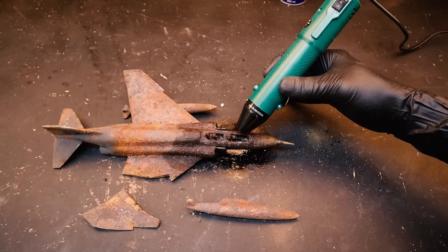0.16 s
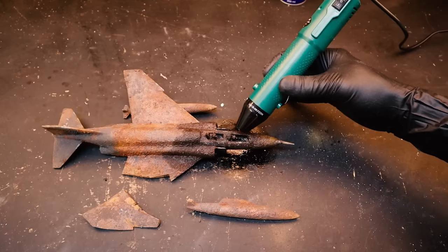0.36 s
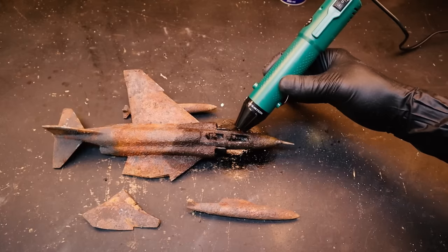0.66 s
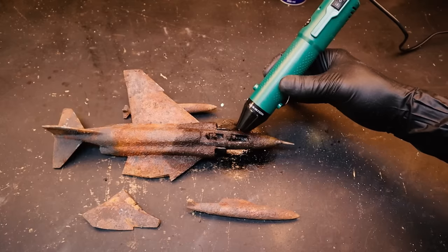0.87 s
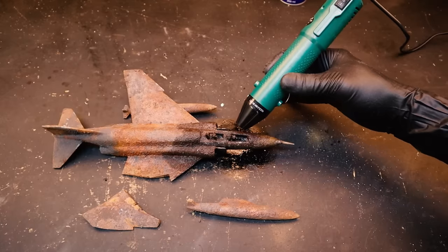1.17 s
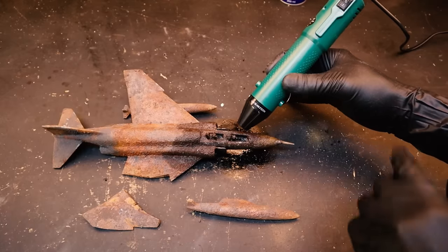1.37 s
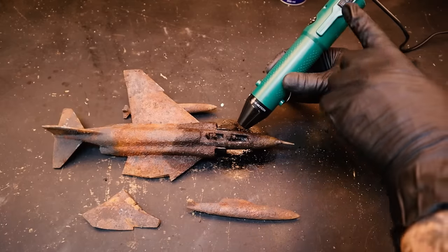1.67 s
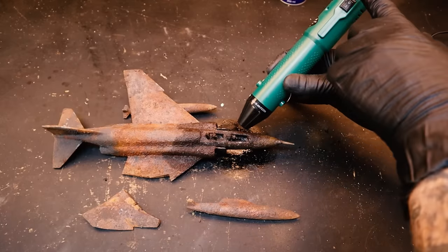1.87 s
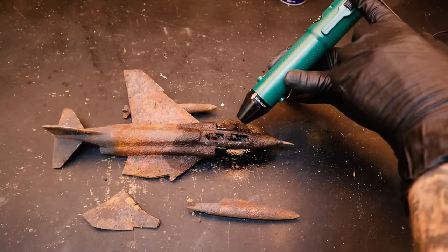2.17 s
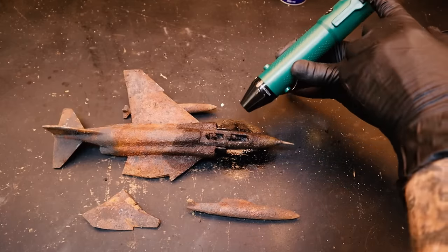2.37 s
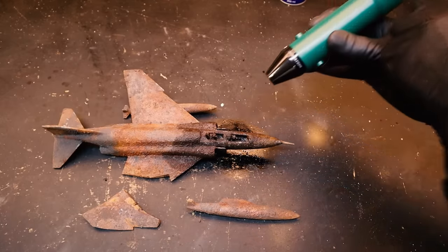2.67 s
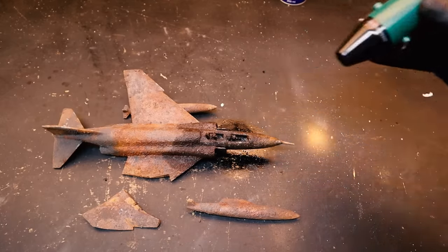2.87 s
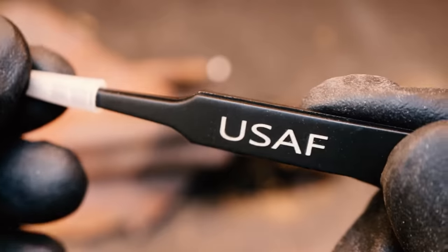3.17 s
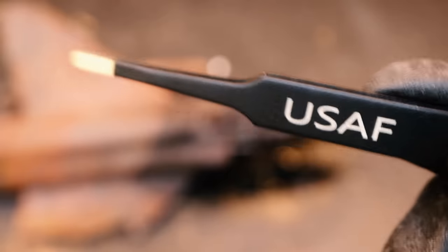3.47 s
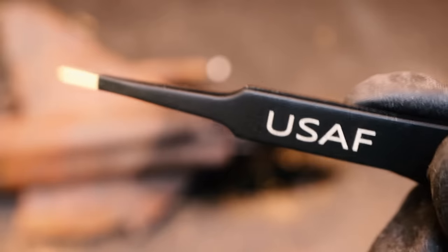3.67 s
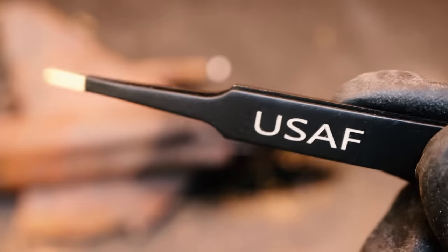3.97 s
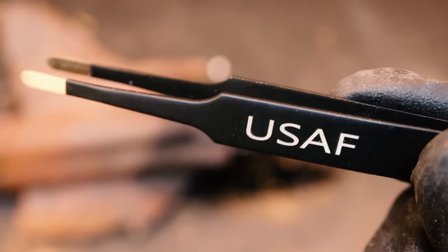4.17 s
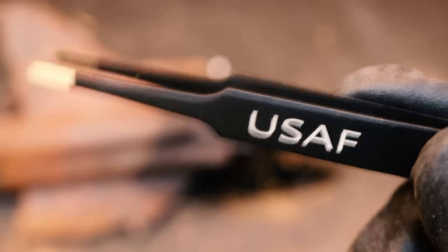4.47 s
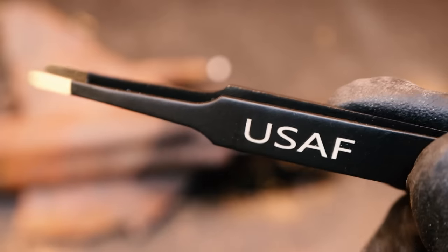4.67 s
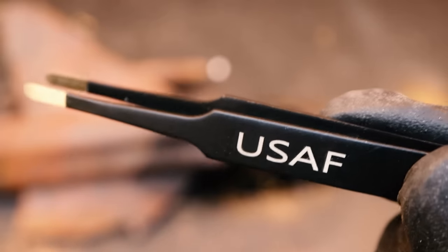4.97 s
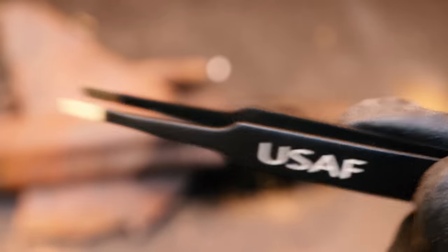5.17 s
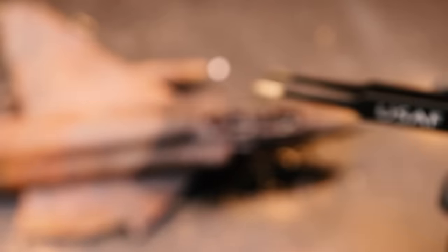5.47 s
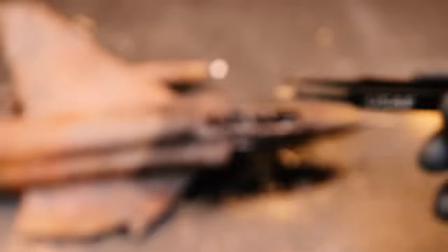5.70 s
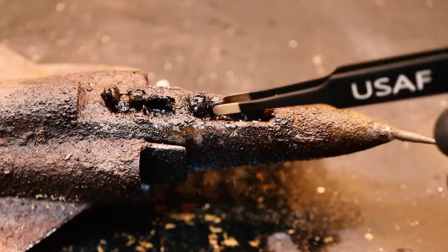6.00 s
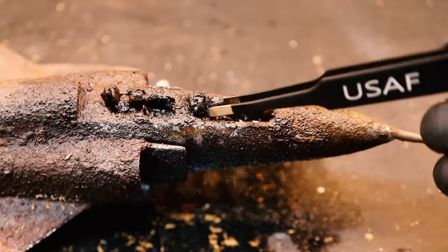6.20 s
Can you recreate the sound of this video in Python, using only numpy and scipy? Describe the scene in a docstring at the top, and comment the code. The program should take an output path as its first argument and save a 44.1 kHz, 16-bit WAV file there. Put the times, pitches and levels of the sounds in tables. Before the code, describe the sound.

Steady high electric whine, sharp switch click and falling spin-down; abrupt cut to hushed insect night, faint metal ticks and a quickening hollow croak-like call.

```python
"""A workbench, then a quiet night outdoors: a small rotary tool whines, is switched off with a snap
and coasts down, rattling; it and the room tone stop short at 3 s as the night air comes in.
The tool is rotor harmonics plus impacts ringing its housing; crickets are trains of falling tones;
light clicks and scrapes of tweezers in gloved hands are shaped noise; a hollow knocking call,
perhaps a frog, is a quickening, fading train of pulses ringing one set of modes."""
import sys
import numpy as np
from scipy import signal
from scipy.fft import rfft, irfft
from scipy.io import wavfile

SR = 44100
rng = np.random.default_rng(int(sys.argv[2]) if len(sys.argv) > 2 else 0)


def generate_wav(signal):
    """Clip the signal to [-1, 1] and save it as 16-bit WAV at the path in sys.argv[1]."""
    frames = np.transpose(np.atleast_2d(signal))
    scaled = np.clip(frames, -1, 1) * 32767
    pcm = np.round(scaled).astype(np.int16)
    wavfile.write(sys.argv[1], SR, pcm)


N = 279594
T = np.arange(N) / SR
HZ = np.fft.rfftfreq(N, 1 / SR)
MAINS_HZ = 50


def amp(db):
    """Decibels to gain."""
    return 10 ** (np.asarray(db) / 20)


def evened(x):
    """Scales to rms 1."""
    return x / np.sqrt(np.mean(x ** 2) + 1e-20)


def read(points, hz):
    """A spectrum table interpolated on a log-frequency axis."""
    f, value = np.transpose(points)
    return np.interp(np.log(hz + 1), np.log(f), value)


def panned(db):
    """Left and right gains for a level difference."""
    return amp(np.array([[.5], [-.5]]) * db)


def coloured(x, db):
    """Filters by a dB spectrum, to rms 1."""
    return evened(irfft(rfft(x) * amp(db), N))


def hiss(db, side_db=-3):
    """Stereo noise of rms 1 with a given spectrum and side-to-mid level."""
    mid, side = rfft(rng.standard_normal((2, N)))
    side = side * amp(side_db)
    return evened(irfft(np.array([mid + side, mid - side]) * amp(db), N))


def hump(hz, octaves):
    """A bell-shaped band in dB, down 4.34 dB at the given octaves from its centre."""
    return -4.34 * (np.log2((HZ + 1) / hz) / octaves) ** 2


def waver(rate_hz):
    """Low-passed noise of rms 1: random variation up to about rate_hz."""
    return coloured(rng.standard_normal(N), -10 * np.log10(1 + (HZ / rate_hz) ** 6))


def echoes(x, t60_s):
    """A dense tail of reflections of energy 1, different for each ear."""
    t = T[:SR // 2]
    tail = rng.standard_normal((2, len(t))) * amp(-60 * t / t60_s)
    tail = tail / np.linalg.norm(tail, axis=1)[:, None]
    return signal.fftconvolve(np.atleast_2d(x), tail, axes=1)[:, :N]


def add(mix, s, sound):
    """Adds a stereo sound at time s."""
    part = mix[:, round(s * SR):][:, :sound.shape[1]]
    part += sound[:, :part.shape[1]]


def ports(x, lag_s=.000045):
    """Sound from the right reaches the left port a little later."""
    return irfft(rfft(x) * np.exp(-2j * np.pi * HZ * lag_s * np.array([[1], [0]])), N)


def tool():
    """Mains pulses push the rotor, so speed and rattle throb until switch-off; then it coasts unevenly."""
    # rotor speed under power: (time [s], speed [turns/s])
    powered_speed = [(0, 326), (.15, 329.3), (.5, 330.3), (1.3, 329.9), (1.6, 330.8), (2.0, 331.1)]
    off_s, coast_s = 2.534, 0.315  # switch opens; time constant of friction
    swing_rad, unsteady_share = .05, .018
    whine_per_halving_db, rattle_per_halving_db = -15, -12  # change each time the speed halves
    full_rattle_db, room_db, room_t60_s = 2, -18, 0.66

    coasted = np.maximum(T - off_s, 0) / coast_s
    halvings = coasted / np.log(2)
    speed = np.interp(T, *np.transpose(powered_speed)) * np.exp(-coasted)
    mains, powered = 2 * np.pi * MAINS_HZ * T, T < off_s
    wobble = 1 + unsteady_share * np.clip((T - off_s) / 0.12, 0, 1) * waver(70)
    push = powered * swing_rad / (2 * np.pi) * (np.sin(mains) + .4 * np.sin(2 * mains))
    turns = np.cumsum(speed * wobble) / SR + push
    ripple = 1 + powered * (0.068 * np.cos(mains) + .055 * np.cos(2 * mains))
    whine_db = whine_per_halving_db * halvings
    rattle_db = full_rattle_db + rattle_per_halving_db * halvings
    tones = whine(speed, turns, mains, whine_db) + rings(turns, halvings) + singing(turns, mains, whine_db)
    tones = tones + amp(room_db) * echoes(tones, room_t60_s)
    return tones + amp(rattle_db) * rattle(turns, ripple) + shudder(turns)


def whine(speed, turns, mains, drive_db):
    """Rotor tones and mains sidebands; as they fall they slide through the housing's resonances."""
    # rotor tones before shifts and coasting: (multiple of speed, multiple of mains, level [dB rms],
    # left-right [dB], left lead [rad])
    rotor_tones = [(1, 0, -55, -1, 0.65), (2, 0, -56, -4, 0.35), (3, 0, -51, -11, -0.6),
                   (4, -1, -55.5, -0.5, 0), (4, 0, -54.5, -1, 1), (5, 0, -37.5, -0.5, 0.102),
                   (5, 1, -59, -1.5, -0.11), (6, -1, -61, -9, -0.57), (6, 0, -40, -2, -0.38),
                   (7, 0, -36, -7.5, -1.03), (7, 1, -74, -16, -2.44), (8, -2, -50, 11, -0.19),
                   (8, -1, -52.5, 8, -.8), (8, 0, -34.5, -7, -0.97), (8, 1, -49, 4.5, -0.94),
                   (9, 0, -41.5, -5, -0.63), (10, -1, -46, -1, -0.62), (10, 0, -40, -3.5, -1.6),
                   (11, -1, -47.5, 0, -1.1), (12, 0, -52.5, 6.5, -2), (13, -1, -42.5, -4, -1.4),
                   (13, 0, -45.5, 1.5, 0.3), (14, -1, -54, 1, -1.1), (14, 0, -47, -6.5, -0.5),
                   (15, 0, -49, -13, -3), (21, 1, -51.5, 12, -0.14), (22, 0, -50, -2, 0.11),
                   (23, -1, -45, 3, -0.083), (24, 1, -53, 17, 0.053), (34, 0, -57, 4, 0.031)]
    # answer of the strong tones: (multiple of speed, multiple of mains, shift at start of run-in [dB],
    # shift with the new grip [dB])
    tone_shifts = [(1, 0, -3, 3.5), (3, 0, 0, -2.5), (4, 0, -4, 9.5), (5, 0, -2, -6), (6, -1, 21, 0),
                   (6, 0, -3, -6.5), (7, 0, -2, 4), (8, 0, -3, -4), (8, 1, 1, -7.5), (9, 0, 2.5, 7),
                   (10, 0, 2, -3.5), (13, -1, -4, -2.5), (13, 0, -2, -4), (23, -1, -3.5, -2)]
    grip_from_s, grip_to_s = 1.4, 2.36  # the hand takes a new grip and lifts the tool
    shell_from = 3.6  # tones above this multiple come through the housing; lower ones shake the whole tool
    flutter_share, flutter_hz, blur_rad, blur_hz = 0.026, 27, 0.0036, 59.3
    imbalance, slide = 0.7, 1.1

    grip = np.clip((T - grip_from_s) / (grip_to_s - grip_from_s), 0, 1)
    settling = running_in()
    shifts = {(round(k), round(m)): early_db * settling + grip_db * grip
              for k, m, early_db, grip_db in tone_shifts}
    response, out = housing_db(HZ), np.zeros((2, N))
    turns = turns + blur_rad / (2 * np.pi) * waver(blur_hz)
    for multiple, sideband, db, pan_db, lead_rad in rotor_tones:
        k, m = round(multiple), round(sideband)
        hz = k * speed + m * MAINS_HZ
        slide_db = np.interp(hz, HZ, response) - np.interp(hz.max(), HZ, response)
        slide_db = slide * slide_db * np.clip((k - shell_from) / shell_from, 0, 1)
        fade_db = drive_db * (1 + imbalance / k)  # shaking from imbalance dies first
        level_db = db + shifts.get((k, m), 0) + slide_db + fade_db
        size = amp(level_db) * (1 + flutter_share * waver(flutter_hz))
        phase = k * 2 * np.pi * turns + m * mains + 2 * np.pi * rng.random()
        phase = phase + lead_rad * np.array([[.5], [-.5]])
        out += np.sqrt(2) * size * panned(pan_db) * np.cos(phase)
    return out


def running_in():
    """Falls from 1 to 0 as the tool settles into its steady sound."""
    run_in_s = 0.64
    return np.exp(-(T / run_in_s) ** 3)


def housing_db(hz):
    """How well the plastic housing radiates each frequency."""
    # broad colour: (frequency [Hz], level [dB])
    colour = [(100, -19), (240, -22.5), (450, -10), (620, -1), (1300, -7.5), (2500, 3), (3150, -2),
              (4200, 1), (6300, -5), (9000, -4), (11600, -7), (12250, -19), (12900, -27.5), (14500, -83.5)]
    # resonances: (frequency [Hz], width [Hz], height above the colour [dB])
    modes = [(731, 74, 6.9), (1024, 220, 7.8), (1660, 224, 11.5), (2313, 210, 8.3), (3014, 117, 8.3),
             (3262, 51, 3.4), (3735, 330, 5.5), (4070, 90, 2.2), (4550, 88, 3.2), (5340, 270, 3.13),
             (6980, 2300, 6.7), (11080, 122, 3.6)]
    return read(colour, hz) + sum(db / (1 + (2 * (hz - f) / width) ** 2) for f, width, db in modes)


def rings(turns, halvings):
    """A falling rotor harmonic sweeps through each resonance and sets it ringing in passing."""
    # resonances: (multiple of speed, frequency [Hz], width [Hz], drive at full speed [dB], left-right [dB])
    resonances = [(6, 1800, 60, -23, -5), (10, 3200, 44, -25.5, -2), (10, 2420, 190, -22.5, -7),
                  (12, 2900, 400, -36, -4), (13, 3300, 300, -39, -3), (15, 3750, 400, -39, -3)]
    per_halving_db = -20
    out = np.zeros((2, N))
    for multiple, hz, width_hz, db, pan_db in resonances:
        drive = np.cos(2 * np.pi * (multiple * turns + rng.random()))
        drive = amp(db + per_halving_db * halvings) * drive
        edges_hz = [hz - width_hz / 2, hz + width_hz / 2]
        band = signal.butter(2, edges_hz, "band", fs=SR, output="sos")
        out += panned(pan_db) * signal.sosfilt(band, drive)
    return out


def singing(turns, mains, drive_db):
    """A rough ring, shaken by rotor and mains, fades as the tool settles and dies as the rotor slows."""
    # tone and sidebands: (multiple of speed, multiple of mains, level [dB])
    sidebands = [(0, 0, -2.5), (0, 1, -6.5), (0, -1, -5), (0, -2, -13.5), (-1, 0, -7)]
    sing_hz, wander_hz, throb_share, throb_hz = 3225, 5, 0.22, 70
    settled_db, early_db, pan_db = -55.5, 15, -11.5
    phase = 2 * np.pi * np.cumsum(sing_hz + wander_hz * waver(30)) / SR
    tone = np.zeros(N)
    for k, m, db in sidebands:
        shaken = phase + 2 * np.pi * (round(k) * turns + rng.random()) + round(m) * mains
        tone += amp(db) * (1 + throb_share * waver(throb_hz)) * np.cos(shaken)
    return np.sqrt(2) * amp(settled_db + early_db * running_in() + drive_db) * tone * panned(pan_db)


def rattle(turns, ripple):
    """Bearing and brush impacts on every turn ring the housing; the brushes hiss in step with them."""
    # impacts within a turn: (place [share of the turn], level [dB])
    impacts = [(0.049, -4), (.33, -8.5), (0.412, -4.5), (0.719, -2.5)]
    clatter_db, brush_db = -33, -35
    buzz_from_hz = 5000  # above this the impacts repeat evenly enough to buzz
    uneven, uneven_low, low_hz, even = 0.7, 0.22, 4000, 0.77

    hits = ripple * sum(amp(db) * np.diff(np.floor(turns - place), prepend=np.floor(-place))
                        for place, db in impacts)
    # the sharp edge of each impact repeats evenly; its weight varies from turn to turn
    edge = irfft(rfft(hits) / (1 + (buzz_from_hz / (HZ + 1)) ** 20), N)
    weight_gain = uneven + uneven_low / (1 + (HZ / low_hz) ** 6)
    weight = irfft(rfft(hits * rng.standard_normal(N)) * weight_gain, N)
    hits = even * edge + weight
    ring = 0.37 * hits + echoes(hits, t60_s=0.0044)[0]
    response = housing_db(HZ)
    clatter = coloured(ring + 1.39 * echoes(hits, t60_s=0.13), response)
    clatter = clatter / np.sqrt(np.mean(clatter[:, :2 * SR] ** 2))  # rms 1 under power
    brushes = hiss(response, side_db=-5) * ripple * (1 + 0.31 * np.cos(2 * np.pi * turns))
    pan_db = read([(700, 1.0), (1300, -4.0), (2500, -2.5), (5000, -4.0), (9000, 0.0)], HZ)
    both = amp(clatter_db) * clatter + amp(brush_db) * brushes
    return ports(irfft(rfft(both) * panned(pan_db), N))


def shudder(turns):
    """The slowing spindle rubs once a turn, and the housing's sharp modes swell and fade."""
    # soft swells: (middle [s], half length [s], level [dB])
    swells = [(2.678, 0.046, -40.5), (2.799, 0.038, -40), (2.898, 0.07, -47.5)]
    # what rings: (frequency [Hz], width [Hz], level [dB])
    sharp_modes = [(734, 360, -12.5), (1810, 43, -0.5), (2290, 46, -6.5), (2620, 92, -11), (2840, 110, -5),
                   (3030, 60, -12), (3280, 40, -7), (4270, 140, -14.5)]
    throb_share, pan_db = 0.21, -6.0
    power = sum(amp(db) ** 2 / (1 + (2 * (HZ - hz) / width) ** 2) for hz, width, db in sharp_modes)
    tilt_db = read([(200, -8), (700, -4.5), (4500, 2.5), (12000, -15)], HZ)
    ringing = hiss(10 * np.log10(power) + tilt_db)
    swell = sum(amp(db) * np.exp(-((T - s) / half) ** 2) for s, half, db in swells)
    return swell * (1 + throb_share * np.cos(2 * np.pi * turns)) * ringing * panned(pan_db)


def clicks(rows, top_hz):
    """Hard parts meet: short decaying noise bursts with a little room."""
    room_db, t = -14, T[:SR // 8]
    out = np.zeros((2, N))
    for s, db, hz, octaves, t60_s, pan_db in rows:
        spectrum_db = hump(hz, octaves) - 10 * np.log10(1 + (HZ / top_hz) ** 40)
        burst = hiss(spectrum_db, side_db=2.5)[:, :len(t)]
        add(out, s, amp(db - 60 * t / t60_s) * burst * panned(pan_db))
    return out + amp(room_db) * echoes(out, t60_s=0.17)


def tool_taps():
    """Taps of the tool, the first one its switch."""
    # (time [s], level [dB], centre [Hz], width [octaves], t60 [s], left-right [dB])
    taps = [(2.5333, -12, 7200, 1.1, 0.021, 0), (2.5354, -21, 7000, 1.4, 0.019, -13),
            (2.899, -38.5, 2350, 0.26, 0.04, -10), (2.9455, -32, 2550, 0.42, .02, -5),
            (2.960, -43, 2450, 0.21, 0.04, -4), (2.996, -47, 2300, 0.27, 0.056, -8)]
    return ports(clicks(taps, top_hz=11800))


def tweezers():
    """Tweezer tips click."""
    # (time [s], level [dB], centre [Hz], width [octaves], t60 [s], left-right [dB])
    tips = [(4.4012, -40, 3780, 0.91, 0.014, -4.5), (4.6115, -40.5, 3900, 0.99, 0.015, -3),
            (4.6595, -50.5, 2230, 0.5, 0.032, -2), (6.288, -55, 5000, 1.2, 0.0098, -2)]
    return clicks(tips, top_hz=14500)


def scrapes():
    """Glove and cap slide on the tweezers: brief, slightly grainy noise."""
    # slides: (middle [s], half length [s], level before grain [dB], centre [Hz])
    slides = [(3.207, .04, -74, 12000), (3.383, .03, -71, 11500), (3.428, 0.021, -64, 8550),
              (4.235, .03, -76, 12000), (4.472, .05, -79, 11700), (4.563, 0.02, -68, 10500),
              (4.697, 0.016, -61, 12000), (4.993, 0.033, -65, 12500), (5.183, 0.038, -66, 11800)]
    grain = amp(2.1 * waver(250))
    return grain * sum(amp(db) * np.exp(-((T - s) / half) ** 2) * hiss(hump(hz, octaves=0.34))
                       for s, half, db, hz in slides)


def knocks():
    """Each pulse rings one hollow body with rasp and low boom; a close reflection and diffuse tail follow."""
    # what each knock rings with: (frequency [Hz], relative level [dB], t60 [s])
    body_modes = [(168, -29, 0.37), (201, -19, 0.23), (304, 10, 0.026), (296, -23, 0.097), (350, -23, .12),
                  (421, -13, 0.16), (488, -17, 0.11), (542, -17, 0.11), (765, -34, 0.08), (1440, -41, 0.04),
                  (1570, -41, 0.045), (2080, -41, 0.038)]
    # rasp spectrum: (frequency [Hz], level [dB])
    rasp_spectrum = [(200, -8), (500, 3), (850, -3), (1300, -5), (1600, -1), (1850, -16), (2200, -12),
                     (3200, -29.5), (6000, -60)]
    # tail spectrum: (frequency [Hz], level [dB])
    tail_spectrum = [(125, -29), (160, -8), (330, 2), (520, -6), (800, -12), (1100, -17.5), (1700, -24),
                     (3000, -43.5)]
    body_db, rise_s, lead_s = -34.5, 0.00397, 0.00098
    boom_db, boom_hz, boom_s = -15.5, 175, 0.044  # boom level relative to the body
    echo_db, echo_s = -10, 0.00648
    rasp_db, rasp_s = -54, 0.0074
    tail_db, tail_t60_s, tail_rise_s = -51.5, 0.93, 0.0047
    low_cut_hz = 138

    t, out = T[:SR // 2], np.zeros((2, N))
    ring = sum(amp(db - 60 * t / t60_s) * np.sin(2 * np.pi * hz * (t - rise_s))
               for hz, db, t60_s in body_modes)
    ring = ring * (1 - np.exp(-(t / rise_s) ** 3))
    boom = amp(boom_db) * signal.windows.tukey(round(boom_s * SR), .5)
    ring[:len(boom)] += boom * np.sin(2 * np.pi * boom_hz * (t[:len(boom)] - rise_s))
    ring = amp(body_db) * ring
    rasp = amp(rasp_db) * (t / rasp_s) ** 2 * np.exp(2 - 2 * t / rasp_s)
    tail = amp(tail_db - 60 * t / tail_t60_s) * (1 - np.exp(-t / tail_rise_s))
    rasp_noise = hiss(read(rasp_spectrum, HZ), side_db=-17)
    tail_noise = hiss(read(tail_spectrum, HZ), side_db=-2.0)
    for s, db in knock_train():
        knock = ring + rasp * alike(rasp_noise, len(t)) + tail * alike(tail_noise, len(t))
        add(out, s - lead_s, amp(db) * knock)
        add(out, s - lead_s + echo_s, amp(db + echo_db) * ring[None])
    return irfft(rfft(out) / (1 + (low_cut_hz / (HZ + 1)) ** 10), N)


def knock_train():
    """Time and dB of each knock: the call starts hesitantly, swells, quickens, fades and trails off."""
    call_s, count = 4.6795, 24
    gap_s, quicken_s, hesitate_s, hesitate_knocks = .0789, .000896, .0143, 1.6
    first_db, fade_per_knock_db = 2, -0.3467
    soft_start_db, soft_end_db, ease_knocks = -12, -4, 0.98
    n = np.arange(count)
    gaps = gap_s - quicken_s * n + hesitate_s * np.exp(-n / hesitate_knocks)
    ends_db = soft_start_db * np.exp(-n / ease_knocks) + soft_end_db * np.exp(-n[::-1] / ease_knocks)
    return zip(call_s + np.cumsum(gaps) - gaps, first_db + fade_per_knock_db * n + ends_db)


def alike(noise, count, share=0.93):
    """A stretch of noise that has a share of its power in common with every other stretch."""
    at = rng.integers(N // 2)
    return np.sqrt(share) * noise[:, -count:] + np.sqrt(1 - share) * noise[:, at:at + count]


def crickets():
    """Wing strokes are short falling tones; chirps and trills swell and fade, blurred by the surroundings."""
    # evenly repeated chirps: (first [s], until [s], period [s], pitch [Hz], level [dB],
    # stroke depth [0-1], left-right [dB])
    bouts = [(2.999, 3.1, .185, 5000, -67, .7, 9), (4.503, 5.7, .184, 4985, -65.5, .85, 11),
             (3.011, 3.48, .186, 5220, -68, .35, 5), (3.57, 3.9, .188, 5300, -70, .35, 2),
             (5.39, 6.4, .184, 5205, -68.5, .35, 5)]
    # single trills and buzzes of other insects: (time [s], length [s], pitch [Hz], level [dB],
    # rate [strokes/s], sag either side of pitch [share], fades [share of length], left-right [dB])
    single_trills = [(3.343, 0.22, 5760, -68, 35, 0.0077, 0.42, 16),
                     (3.884, 0.26, 5890, -65, 43, 0.0076, 0.49, 14),
                     (4.432, .1, 11600, -76, 62, .012, .3, 1), (4.688, .09, 11600, -70, 55, .012, .4, 1),
                     (4.825, 0.31, 5830, -62, 36, .007, .8, 16),
                     (5.417, 0.26, 5650, -68.5, 44, .01, 0.49, 16),
                     (6.038, 0.032, 4450, -55, 81, .024, .12, 11),
                     (6.216, 0.092, 4470, -52.5, 80, 0.032, .03, 9)]
    chirp_s, chirp_rate_hz, chirp_sag, chirp_unsteady = 0.075, 39, 0.0058, 0.0026
    trill_rise_hz_per_s, trill_build_db_per_s = 262, 9
    trill_unsteady, trill_depth = 0.0056, 0.78
    wet_db = -6

    out, drift = np.zeros((2, N)), waver(93)
    chirps = [(s, chirp_s, hz, db, chirp_rate_hz, chirp_sag, .2, pan_db, 0, 0, chirp_unsteady, depth)
              for first, until, period, hz, db, depth, pan_db in bouts
              for s in np.arange(first, until, period)]
    trills = [(*row, trill_rise_hz_per_s, trill_build_db_per_s, trill_unsteady, trill_depth)
              for row in single_trills]
    for s, length, hz, db, rate, sag, soft, pan_db, rise, build, unsteady, depth in chirps + trills:
        t = T[:round(length * SR)]
        from_middle = t - length / 2
        stroke = t * rate % 1
        pitch = hz * (1 + sag * (1 - 2 * stroke) + unsteady * np.interp(s + t, T, drift))
        pitch = pitch + rise * from_middle
        tone = np.sqrt(2) * np.sin(2 * np.pi * np.cumsum(pitch) / SR)
        strokes = 1 - depth + depth * np.sin(np.pi * stroke)
        swell = signal.windows.tukey(len(t), soft) * (0.95 + 0.19 * np.sin(np.pi * t / length))
        add(out, s, amp(db + build * from_middle) * tone * strokes * swell * panned(pan_db))
    return out + amp(wet_db) * echoes(out, t60_s=0.31)


def night():
    """Still air as shaped noise, with wavering noise bands of far insects."""
    # air spectrum: (frequency [Hz], relative level [dB])
    air_spectrum = [(15, -23), (30, 1.5), (58, 1), (90, -1.5), (150, -1.5), (260, -6), (900, -13.5),
                    (2700, -17), (3500, -12.5), (5900, -19), (6700, -23), (8800, -33), (11500, -23.5),
                    (13200, -32.5), (15000, -35), (16500, -60)]
    # air width: (frequency [Hz], side-mid [dB])
    air_side = [(60, -8), (110, -8), (200, -2), (350, 2), (640, 3.5), (1160, 2.5), (2100, 2), (3800, -6.5),
                (6870, 2), (12400, -3)]
    # air balance: (frequency [Hz], left-right [dB])
    air_pan = [(60, 0), (110, 3.5), (200, 2), (350, 1), (640, 0), (1160, 1), (2100, 0.5), (3800, -1),
               (6870, 1), (12400, 1.5)]
    # far insect chorus: (centre [Hz], half width at -6 dB [Hz], level before waver [dB])
    insects = [(2474, 49, -76.5), (3450, 48, -74.5), (4426, 150, -69.5), (5450, 300, -72.5),
               (5730, 230, -72)]
    air_db = -61
    balance_db = read(air_pan, HZ) * np.array([[.5], [-.5]])
    air = hiss(read(air_spectrum, HZ) + balance_db, read(air_side, HZ))
    far = np.zeros((2, N))
    for hz, width, db in insects:
        band_db = -20 * np.log10(1 + ((HZ - hz) / width) ** 2)
        far += amp(db + 0.49 * waver(12)) * hiss(band_db)
    return amp(air_db) * air + far * panned(3.2)


def room_tone():
    """The steady low noise of the room around the bench."""
    # (frequency [Hz], relative level [dB])
    bench_spectrum = [(20, -6.5), (33, -5.5), (46, 4), (60, -9), (110, -11), (200, -11.5), (330, -9.5),
                      (600, -15.5), (1400, -12), (4000, -58.5)]
    return amp(-59.0) * hiss(read(bench_spectrum, HZ), side_db=-10.5)


def scene():
    """The tool at the bench until it stops short; night air, tweezers, crickets and the call after it."""
    stop_s, fade_s = 3.013, .004
    running = np.clip((stop_s - T) / fade_s, 0, 1)
    bench = tool() + tool_taps() + room_tone()
    outdoors = (1 - running) * night() + crickets() + knocks()
    return bench * running + outdoors + tweezers() + scrapes()


def record(dry):
    """The band limit: a steep linear-phase low-pass."""
    edge_hz = 15700
    low_pass = signal.firwin(511, edge_hz, window=("kaiser", 9), fs=SR)
    return signal.oaconvolve(dry, low_pass[None], "same")


dry = scene()
out = record(dry)
generate_wav(out)
```